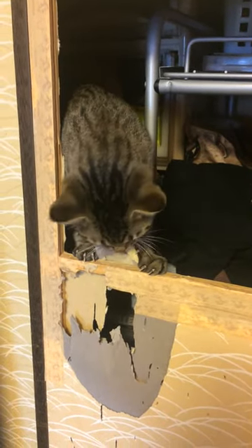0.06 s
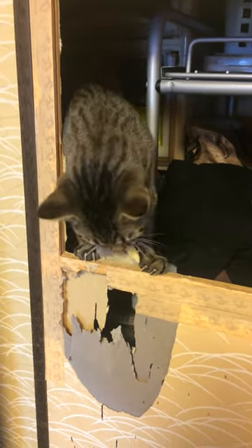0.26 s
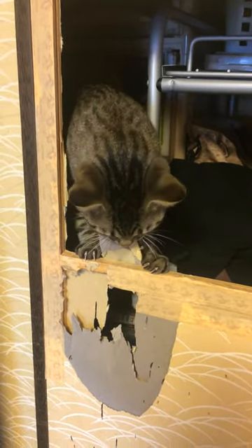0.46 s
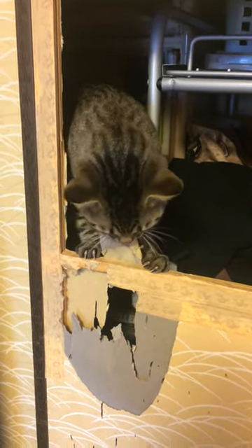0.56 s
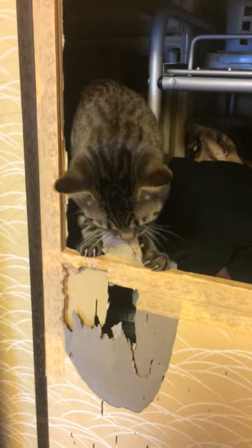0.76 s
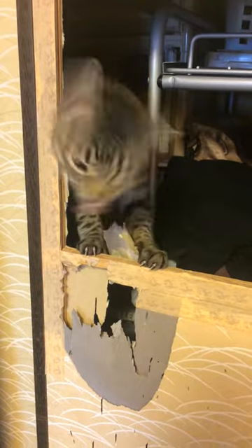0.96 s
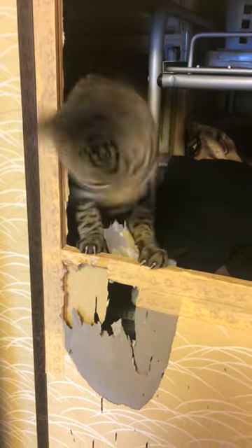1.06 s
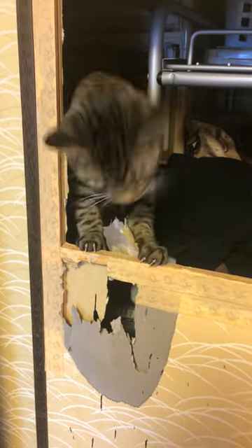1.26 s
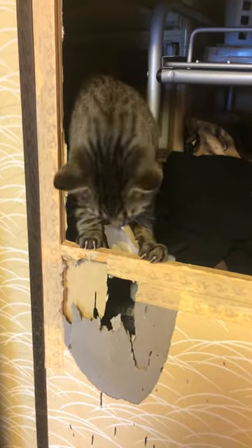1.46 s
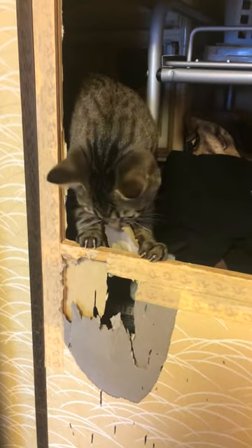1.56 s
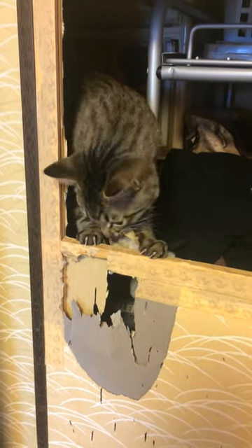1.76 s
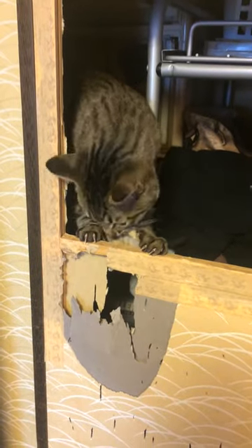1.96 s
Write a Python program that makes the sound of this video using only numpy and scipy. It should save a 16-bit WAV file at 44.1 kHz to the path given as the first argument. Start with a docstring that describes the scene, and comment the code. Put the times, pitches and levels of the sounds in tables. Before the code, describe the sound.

Close, crisp tearing of a paper door by a kitten's teeth, followed by faint chewing.

```python
"""In a small furnished room, close by, a kitten bites at the paper of a sliding door.
Its teeth crinkle the sheet, fibres part in two rips, and the taut paper gives way in sharp snaps;
each break is an impulse, coloured by the resonances of the sheet. The kitten then chews the scrap,
while its shifting weight makes the door thud and rumble."""
import sys
import numpy as np
from scipy import signal
from scipy.fft import rfft, irfft
from scipy.io import wavfile

SR = 44100
rng = np.random.default_rng(int(sys.argv[2]) if len(sys.argv) > 2 else 0)


def file_out(sig):
    """Save sig as 16-bit WAV at sys.argv[1]."""
    # one column per channel
    cols = np.atleast_2d(sig).T
    # limit, then scale
    lim = np.clip(cols, -1, 1)
    pcm = np.round(lim * 32767).astype(np.int16)
    wavfile.write(sys.argv[1], SR, pcm)


N = 88200
T = np.arange(N) / SR


def snaps():
    """Sudden release of tension excites the sheet's modes. Returns direct sound and room feed."""
    # Each row: start in seconds; the flap's frequency and bandwidth in Hz and gain in dB; frequency
    # in Hz and gain in dB for fold, crack, edge and fibre in turn; splinters and room feed in dB.
    breaks = [(0.2124, 1065, 646, 12.5, 1980, 12.5, 3650, 13.5, 5840, 5.5, 8500, 1, -23, -9),
              (0.2764, 1310, 200, 5.5, 1610, -5, 4000, -7.5, 5660, -4.5, 12800, -2, 2, -10),
              (0.6756, 1240, 500, 9, 1620, 3, 2510, -1.5, 4570, -3.5, 7800, -10, 1.5, -21),
              (0.6888, 1430, 447, 15.5, 1840, -3, 4440, -18, 6000, -4, 8600, -20, -7, -10.5),
              (0.9008, 725, 482.5, 10, 1170, 5.5, 2450, 12, 4010, 11, 7730, 9, -15, -12)]
    fold_q, crack_q, edge_q, fibre_q, bend_q = 2.6, 4.5, 4.5, 6.6, 0.74
    echo_s, echo_db = .00165, -16.5
    out = 0
    for (start, flap_hz, flap_width, flap_db, fold_hz, fold_db, crack_hz, crack_db,
         edge_hz, edge_db, fibre_hz, fibre_db, splinter_db, room_db) in breaks:
        pop = 1.0 * (np.arange(N) == int(start * SR))
        splinters = fracture(start, splinter_db, decay_s=.0011)
        splinters /= np.linalg.norm(splinters)
        flap = from_db(flap_db) * band(resonance(pop, flap_hz, flap_width), 4000, "low")
        fold = from_db(fold_db) * resonance(pop, fold_hz, fold_hz / fold_q)
        crack = from_db(crack_db) * resonance(splinters, crack_hz, crack_hz / crack_q)
        edge = from_db(edge_db) * resonance(splinters, edge_hz, edge_hz / edge_q)
        fibre = from_db(fibre_db) * resonance(splinters, fibre_hz, fibre_hz / fibre_q)
        out = out + np.outer([1, from_db(room_db)], flap - fold + crack + edge + fibre)
    for hz in (3000, 7000):   # all-pass stages: dispersive bending waves smear each snap
        out = out - 2 * resonance(out, hz, hz / bend_q)
    frame_echo = from_db(echo_db) * np.roll(out, int(echo_s * SR), axis=1)
    return band(band(out + frame_echo, 437, "high", order=3), 12000, "low")


def tearing():
    """Parting fibres sum to shot noise: gnawing, a slow rip, a fast rip and a faint brushing."""
    # Each row: time in seconds, level in dB.
    gnaw_levels = [(0, -63.5), (.04, -58), (.10, -59), (.125, -59.5), (.17, -59.5), (.205, -56.5),
                   (.25, -58.5), (.274, -59), (.28, -45.5), (.298, -56.5), (.312, -74), (.362, -69),
                   (.38, -73)]
    slow_rip_levels = [(.36, -88), (.373, -54), (.412, -61), (.432, -51.5), (.459, -46.5), (.48, -51),
                       (.495, -48), (.525, -52.5), (.565, -50), (.595, -59), (.625, -53.5), (.657, -54),
                       (.686, -37.5), (.70, -46), (.711, -58)]
    fast_rip_levels = [(.862, -67), (.867, -45), (.878, -40.5), (.884, -31), (.89, -35.5), (.897, -26.5),
                       (.904, -45), (.917, -42), (.927, -54), (.96, -70)]
    brush_levels = [(.72, -80), (.768, -66), (.783, -57), (.805, -75.5), (.86, -60.5), (.97, -75.5),
                    (1.1, -83), (1.69, -81), (1.76, -70.5), (1.83, -73.5), (1.89, -81), (1.945, -65.5),
                    (2, -78.5)]
    # The spectrum of each. Each row: frequency in Hz, relative gain in dB.
    gnaw_tone = [(300, -35), (700, -11.5), (1270, -3.5), (1900, 0), (2800, -7.5), (4100, 0), (5000, -9.5),
                 (6500, -7.5), (9700, -8), (11700, -15.5), (15000, -12.5)]
    slow_rip_tone = [(180, -17), (300, -5), (390, -1.5), (423, -10), (474, -8), (523, -23), (814, -7.5),
                     (1230, -3), (1490, -4.5), (3610, -5), (15000, -15)]
    fast_rip_tone = [(150, -38), (250, -25), (500, -20), (1050, 1), (1900, -1), (2500, -4), (3000, 0),
                     (3700, -2), (6000, -4), (9400, -11.5), (11600, -23.5), (15000, -15), (17000, -32)]
    brush_tone = [(500, -10.5), (1500, 0), (3800, -2.5), (6000, -6.5), (9000, -3.5), (15000, -8.5)]
    gnaw = shaped(fibres(per_s=7000, spread_db=2.5), gnaw_tone, gnaw_levels)
    slow_rip = shaped(fibres(per_s=9000, spread_db=6.5), slow_rip_tone, slow_rip_levels)
    fast_rip = shaped(fibres(per_s=6700, spread_db=2.0), fast_rip_tone, fast_rip_levels)
    brush = shaped(fibres(per_s=3300, spread_db=5.0), brush_tone, brush_levels)
    return gnaw + slow_rip + fast_rip + brush


def creases():
    """Buckling: a small crease flips with a bright tick and rings briefly."""
    # Each row: start in seconds, relative level in dB, ring frequency in Hz.
    flips = [(0.0391, -41, 2510), (0.0505, -45, 4070), (.057, -36, 3640), (0.0684, -30, 4150),
             (.0848, -33, 4050), (0.111, -52, 9750), (0.1296, -30, 9500), (.1437, -35, 9300),
             (.1474, -29.5, 4000), (0.1793, -38, 7240), (0.196, -29, 8140), (.2015, -23.5, 3555),
             (0.3738, -35, 3700), (0.4579, -25, 2660), (0.458, -27, 3750), (0.6406, -25.5, 7900),
             (0.6467, -32, 3300), (0.7478, -44, 4200), (.7744, -32, 3570), (0.8494, -38, 3263),
             (0.866, -42, 3000)]
    # The spectrum of the ticks. Each row: frequency in Hz, gain in dB.
    tone = [(400, -18), (1500, -12.5), (4000, 1.5), (6200, -10), (9500, -4.5), (15000, -11.5)]
    gain_db, ring_db, ring_q = 4, -0.5, 4.5
    out = 0
    for start, db, hz in flips:
        tick = from_db(db + gain_db) * fracture(start, shower_db=5.5, decay_s=0.00061)
        out = out + tick + from_db(ring_db) * resonance(tick, hz, hz / ring_q)
    return coloured(out, tone)


def rasps():
    """Friction: teeth and the loose flap rub the paper; near the end come soft, low mouth sounds."""
    # Each row: start and end in seconds, level in dB, centre frequency in Hz.
    rubs = [(0.109, 0.16, -55, 9300), (0.164, 0.234, -64, 9300), (.216, .244, -50, 3000),
            (.217, .236, -50, 6180), (.279, 0.305, -57, 12000), (0.368, 0.422, -64.5, 3570),
            (0.42, 0.473, -55.5, 1420), (0.488, 0.619, -66, 425), (0.665, 0.703, -44.5, 1430),
            (.881, .923, -46, 13700), (.882, .90, -43, 2500), (1.19, 1.228, -70, 2300),
            (1.211, 1.23, -61, 1290), (1.214, 1.255, -70, 2850), (1.357, 1.374, -70, 2500),
            (1.44, 1.469, -63.5, 541), (1.559, 1.595, -67, 620), (1.735, 1.763, -67, 536),
            (1.926, 1.975, -77, 3000)]
    rasp_q, fade_s = 4.0, .003
    out = 0
    for start, end, db, hz in rubs:
        contact = np.clip(np.minimum(T - start, end - T) / fade_s, 0, 1)
        catches = fibres(per_s=17000, spread_db=7.0)
        rasp = resonance(resonance(catches, hz, hz / rasp_q), hz, hz / 2)
        out = out + from_db(db) * contact * rms_one(rasp)
    return out


def bites():
    """Teeth close on the scrap, and a damped resonance dulls each crunch in the mouth."""
    # Each row: start in seconds, gain in dB, centre in Hz, crunch relative to its click in dB.
    closures = [(.462, -3.5, 1720, -19), (0.4731, -6.5, 950, -12), (0.4893, -6, 880, -12),
                (0.971, -25.5, 880, 12.5), (1.06, -24.5, 938, 5.5), (1.097, -24.5, 1470, 0.5),
                (1.172, -8, 1540, 4.5), (1.224, -13.5, 1071, 8.5), (1.242, -19, 970, 9.5),
                (1.319, -22.5, 1166, 1.5), (1.364, -15, 1048, 4), (1.375, -22, 1504, -4),
                (1.494, -22, 955, 3)]
    # The spectrum of the chewing. Each row: frequency in Hz, gain in dB.
    tone = [(150, -6.5), (500, 5), (1800, -5), (3200, -11.5), (6000, -14), (15000, -9.5)]
    mouth_q = 3.1
    out = 0
    for start, db, hz, crunch_db in closures:
        crunch = fracture(start, crunch_db, decay_s=0.0078)
        out = out + from_db(db) * resonance(crunch, hz, hz / mouth_q)
    return coloured(out, tone)


def door():
    """Forced vibration: under the paws the door rumbles, thuds and rings in its lowest mode."""
    # The rumble and the panel's mode. Each row: time in seconds, level in dB.
    rumble_levels = [(0, -65.5), (.14, -63.5), (.2, -64.5), (.29, -62), (.35, -72), (.48, -63.5),
                     (.58, -66), (.67, -62.5), (.705, -53.5), (.745, -53.5), (.84, -64.5), (.9, -51),
                     (.99, -50.5), (1.06, -55.5), (1.16, -60), (1.22, -51.5), (1.3, -53.5), (1.48, -54.5),
                     (1.6, -55.5), (1.68, -60.5), (1.8, -59.5), (2, -62.5)]
    mode_levels = [(0, -93), (.14, -58.5), (.26, -85.5), (1.15, -73), (1.39, -55.5), (1.6, -54),
                   (1.68, -63), (1.8, -53.5), (2, -60.5)]
    # The spectrum of the rumble. Each row: frequency in Hz, relative gain in dB.
    rumble_tone = [(15, -43), (25, -11), (75, 5.5), (280, -10.5), (338, -14.5), (468, -19), (605, -16),
                   (756, -27.5), (977, -26), (1120, -36.5), (1500, -30.5), (1950, -54.5), (3300, -120)]
    # Jolts of the frame. Each row: start in seconds, envelope peak in dB, frequency in Hz.
    thuds = [(0.281, -52.5, 151), (.48, -52, 155), (.625, -45.5, 149.5), (.686, -43.5, 239),
             (0.691, -42, 85), (.70, -42.5, 152), (.893, -44, 320), (0.898, -55.5, 120),
             (0.911, -46.5, 215), (0.97, -35.5, 157), (1.114, -50.5, 184), (1.175, -52.5, 333),
             (1.213, -39.5, 108.3), (1.235, -51.5, 337.4), (1.323, -45.5, 131.6), (1.443, -48.5, 167),
             (1.574, -47, 218)]
    mode_hz, waver_hz = 74, 2.5
    rise_s, decay_s = 0.017, 0.008
    rumble = shaped(rng.standard_normal(N), rumble_tone, rumble_levels)
    waver = waver_hz * rms_one(band(rng.standard_normal(N), 12, "low"))
    phase = 2 * np.pi * np.cumsum(mode_hz + waver) / SR
    out = rumble + level(mode_levels) * np.sqrt(2) * np.sin(phase)
    for start, db, hz in thuds:
        age = np.maximum(T - start, 0)
        swell = np.minimum(age / rise_s, 1) * np.exp(-np.maximum(age - rise_s, 0) / decay_s)
        out = out + from_db(db) * swell * np.sin(2 * np.pi * hz * age)
    return out


def room(x):
    """Reverberation: dense reflections decay exponentially, most slowly in the high treble."""
    # Each row: frequency in Hz, time to fall by 60 dB in seconds.
    decay_times = [(200, 0.077), (1200, 0.093), (3500, 0.092), (7000, .10), (14000, 0.21)]
    # The spectrum of the reflections. Each row: frequency in Hz, gain in dB.
    tone = [(200, -6.5), (700, 0), (1300, -5), (2600, -0.5), (4000, -3), (5000, -3), (6300, -5),
            (8000, -6.5), (10000, -10), (15000, -12)]
    edges_hz, delay_s = np.geomspace(100, 16000, 10), 0.0016
    tail = 0
    for low, high in zip(edges_hz, edges_hz[1:]):
        hz = np.sqrt(low * high)
        decay = from_db(-60 * np.minimum(T / at_hz(decay_times, hz), 3)) * (T > delay_s)
        reflections = band(rng.standard_normal(N), [low, high], "band")
        tail = tail + reflections * decay / np.linalg.norm(decay) * from_db(at_hz(tone, hz))
    return signal.fftconvolve(x, tail)[:N]


def air():
    """Stationary noise: the faint, low hush of the room."""
    # Each row: frequency in Hz, relative gain in dB.
    tone = [(120, -29.5), (200, -0.5), (277, -19), (560, -14), (1330, -20.5), (1720, -20.5), (4010, -31.5),
            (15000, -37)]
    return from_db(-69) * rms_one(coloured(rng.standard_normal(N), tone))


def fibres(per_s, spread_db):
    """A Poisson train of tiny uneven breaks, swelling in stick-slip jerks; unit power."""
    slip_hz, slip_db = 220, 2.5
    sizes = from_db(spread_db * np.minimum(rng.exponential(1, N), 3)) * rng.choice([-1, 1], N)
    jerks = from_db(slip_db * rms_one(band(rng.standard_normal(N), slip_hz, "low")))
    return rms_one(jerks * sizes * (rng.random(N) < per_s / SR))


def fracture(start, shower_db, decay_s):
    """A fracture cascade: a unit click trailed by a dying shower of further breaks."""
    shower = rng.standard_normal(N) * np.exp(-np.clip((T - start) / decay_s, 0, 60)) * (T > start)
    shower *= from_db(shower_db) / np.linalg.norm(shower)
    shower[int(start * SR)] += 1
    return shower


def from_db(db):
    """Decibels to amplitude ratio."""
    return 10 ** (np.asarray(db) / 20)


def rms_one(x):
    """Normalisation to unit power."""
    return x / np.sqrt(np.mean(x ** 2) + 1e-20)


def level(rows):
    """An envelope through points in seconds and dB, silent outside them."""
    return from_db(np.interp(T, *np.transpose(rows), left=-140, right=-140))


def at_hz(points, hz):
    """Interpolation on a logarithmic frequency axis."""
    frequencies, values = np.transpose(points)
    return np.interp(np.log(hz + 1e-9), np.log(frequencies), values)


def band(x, hz, kind, order=2):
    """A Butterworth filter."""
    sections = signal.butter(order, np.clip(hz, 10, .48 * SR), kind, fs=SR, output="sos")
    return signal.sosfilt(sections, x + 1e-18)


def resonance(x, hz, width_hz):
    """A damped resonator with unit gain at its peak."""
    peak = signal.iirpeak(min(hz, .45 * SR), hz / min(width_hz, SR / 4), fs=SR)
    return signal.lfilter(*peak, x + 1e-18)


def coloured(x, tone):
    """A minimum-phase filter through points in Hz and dB."""
    bins_hz = np.arange(N + 1) * SR / (2 * N)
    cepstrum = irfft(np.log(from_db(at_hz(tone, bins_hz))))
    cepstrum[1:N] *= 2   # folding onto positive time makes the filter causal
    cepstrum[N + 1:] = 0
    return irfft(rfft(x, 2 * N) * np.exp(rfft(cepstrum)))[:N]


def shaped(x, tone, levels):
    """Source and filter: an excitation takes on a spectrum, then an envelope."""
    return level(levels) * rms_one(coloured(x, tone))


def scene():
    """Superposition: paper and mouth sounds with their reflections, the door and quiet air."""
    snap, snap_to_room = snaps()
    rustle = tearing() + creases() + rasps()
    chewing = bites()
    reflections = room(snap_to_room + from_db(-15) * rustle + from_db(-4) * chewing)
    background = air() + door()
    return (snap + rustle + chewing + reflections + background)[None]


def record(dry):
    """Band limiting: a steep elliptic low-pass removes the highest treble."""
    cutoff_hz = 15250
    return signal.sosfilt(signal.ellip(10, .2, 70, cutoff_hz, fs=SR, output="sos"), dry)


dry = scene()
out = record(dry)
file_out(out)
```